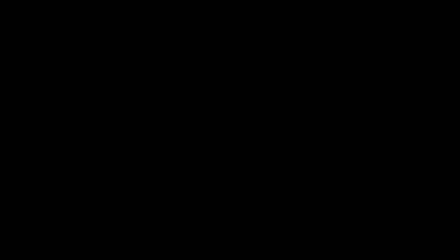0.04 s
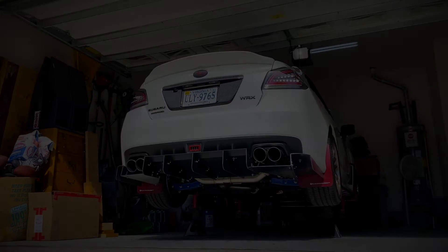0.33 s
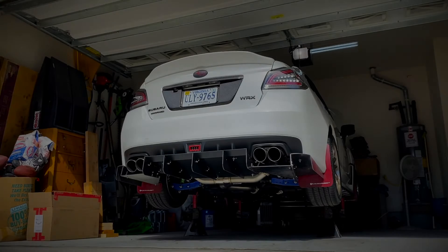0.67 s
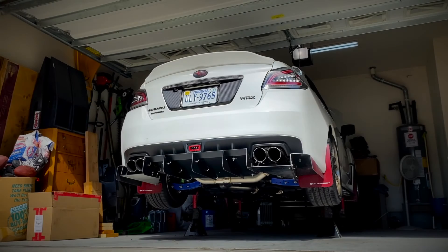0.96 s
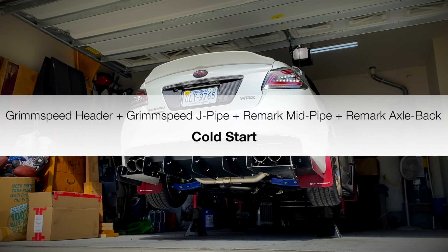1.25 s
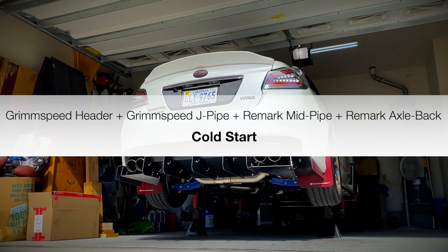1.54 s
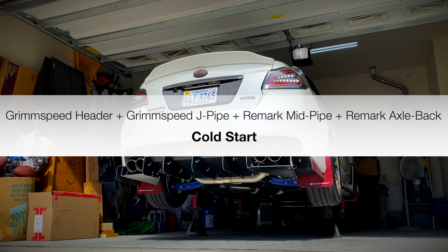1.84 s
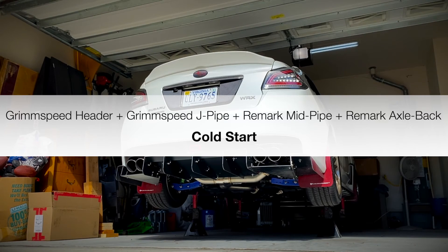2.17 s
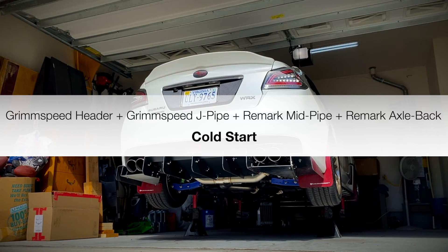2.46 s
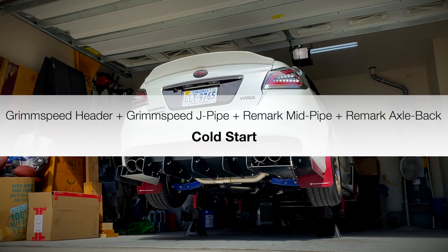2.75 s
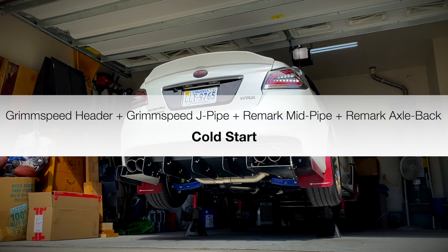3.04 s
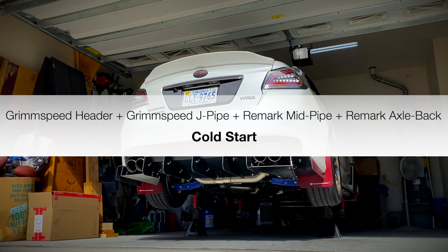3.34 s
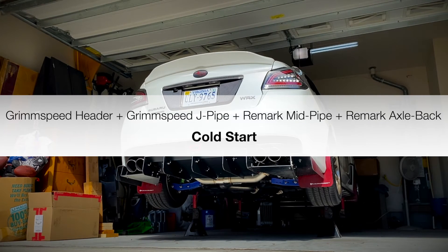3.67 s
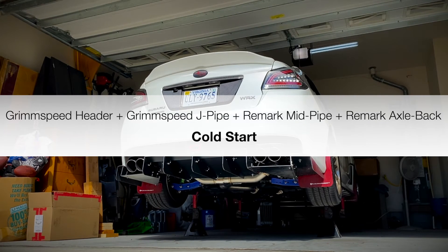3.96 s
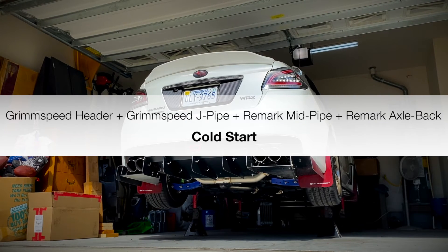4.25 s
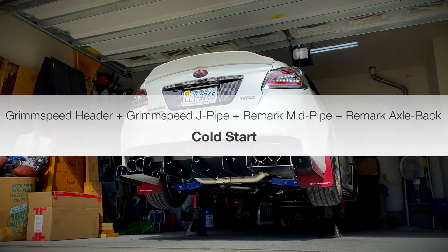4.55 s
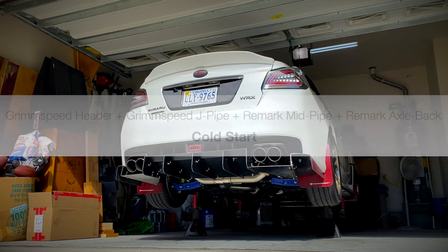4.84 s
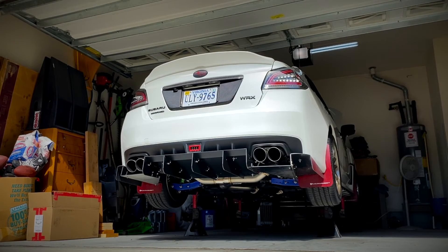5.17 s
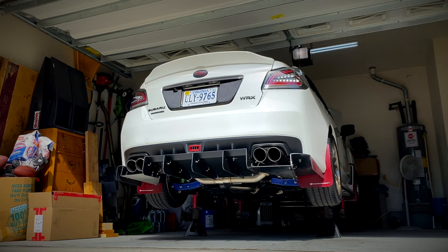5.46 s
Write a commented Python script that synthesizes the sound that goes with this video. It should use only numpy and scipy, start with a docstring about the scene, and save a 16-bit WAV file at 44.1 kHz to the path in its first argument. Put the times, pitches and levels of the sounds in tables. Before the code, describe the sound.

A quiet garage fades in over the first second, heard from behind a parked car: steady compressor hum, thin hiss and a low rumble of air. From 1.3 seconds a bird chirps faintly outside, on and off. Between 2.3 and 3.1 seconds the car body gives four dull thumps, the hardest at 2.8 seconds with a tiny metallic ping. From 4.9 seconds valves knock softly, relays click and the fuel pump whirrs briefly. At about 5.3 seconds the starter engages with a sudden, loud steel clack and a low jolt, then cranks the cold engine. Gear teeth rattle, grind and whine, labouring on each of three compressions while the exhaust gives low, booming puffs. The walls add a short echo. The cranking is the loudest sound and is still going at the end, around 5.7 seconds, before the engine fires.

```python
"""A garage fades in, heard from behind a parked car: compressor hum and hiss over rumbling air.
From 1.3 s a bird chirps faintly outside. At 2.3-3.1 s the car body thumps and a fitting pings.
From 4.9 s valves knock, relays click and the fuel pump primes. At 5.27 s the starter throws its
pinion into the ring gear, jolts the cold engine and cranks it: gear teeth rattle in the bell
housing, harder on each compression, and the exhaust puffs."""
import sys
import numpy as np
from scipy import signal
from scipy.fft import rfft, irfft, next_fast_len
from scipy.io import wavfile
from scipy.ndimage import map_coordinates

SR = 44100
rng = np.random.default_rng(int(sys.argv[2]) if len(sys.argv) > 2 else 0)


def wav_out(sig):
    """Save sig, one row per channel (or a flat mono array), as 16-bit PCM at SR to the path in sys.argv[1]."""
    wavfile.write(sys.argv[1], SR, np.round(np.clip(np.atleast_2d(sig).T, -1, 1) * 32767).astype(np.int16))


N = 251811
T = np.arange(N) / SR
CRANK_S = 5.27

# Fridge compressor and mains tones. Each row: frequency in Hz, level in dB.
HUM_TONES = [(59.2, -57.5), (119.9, -57), (178.8, -65.5), (213, -68), (239.7, -62), (298.3, -65.5),
             (343, -76.5), (358, -78), (416, -80), (479.3, -77.5)]
# Room noise. Each row: frequency in Hz, left-right correlation.
AIR_CORRELATION = [(60, 1), (300, 0.46), (800, 0.79), (1500, 0.29), (3000, 0.67), (4800, 0.068), (6500, 1),
                   (8400, 0.43), (10000, 0.99)]
# Compression strokes. Each row: peak time in seconds, load 0-1, exhaust puff in dB.
COMPRESSIONS = [(5.32, .3, -45.5), (5.435, .42, -41), (5.655, 0.98, -38.5)]


def amp(db):
    """Decibels to gain."""
    return 10 ** (np.asarray(db) / 20)


def unit(x):
    """x at rms 1."""
    return x / np.sqrt(np.mean(x ** 2) + 1e-20)


def along(points, hz):
    """Interpolate (Hz, value) points on a log frequency axis."""
    f, v = np.transpose(points)
    return np.interp(np.log(hz + 1), np.log(f + 1), v)


def wobble(rate_hz):
    """Smooth random curve, rate_hz knots a second."""
    return map_coordinates(rng.standard_normal(int(N * rate_hz / SR) + 4), [T * rate_hz])


def filtered(x, response):
    """x through a complex frequency response."""
    n = x.shape[-1]
    m = next_fast_len(n + SR // 2)
    return irfft(rfft(x, m) * response(np.fft.rfftfreq(m, 1 / SR)), m)[..., :n]


def coloured(x, spectrum):
    """x shaped by a (Hz, dB) curve, at rms 1."""
    return unit(filtered(x, lambda hz: amp(along(spectrum, hz))))


def resonate(x, peaks):
    """x through (Hz, width Hz, dB) resonances of alternating sign, at rms 1."""
    def response(f):
        return sum((-1) ** k * amp(db) * 1j * f * width / (hz * hz - f * f + 1j * f * width)
                   for k, (hz, width, db) in enumerate(peaks))
    return unit(filtered(x, response))


def waver(x, depth_ms, rate_hz):
    """Unsteady pitch from a wandering delay."""
    return map_coordinates(x, [(T + depth_ms / 1000 * wobble(rate_hz)) * SR])


def ring(modes, t, detune=0):
    """Damped (Hz, dB, t60 s) modes, varied on each strike."""
    return sum(amp(db + rng.normal(0, 1) - 60 * t / t60_s)
               * np.sin(2 * np.pi * (hz * (1 + detune * rng.normal()) * t + rng.random()))
               for hz, db, t60_s in modes)


def arrive(x, lag_ms=.297):
    """Sound off the side wall reaches the left microphone first."""
    return filtered(x, lambda hz: np.exp(np.outer([1, -1], 1j * np.pi * hz * lag_ms / 1000)))


def panned(x, balance):
    """Pan by a (Hz, left minus right dB) curve."""
    return filtered(x, lambda hz: amp(np.outer([.5, -.5], along(balance, hz))))


def stereo(pair, correlation):
    """Two independent signals mixed to a correlation curve, left leading."""
    def weights(hz):
        angle = np.arccos(np.clip(along(correlation, hz), -1, 1)) / 2
        return np.array([np.cos(angle), np.sin(angle)])
    mid, side = filtered(pair, weights)
    return arrive(np.array([mid + side, mid - side]))


def garage(x, wet_db):
    """Direct sound shadowed by the car, plus wall reverb that dies sooner in the treble."""
    # Reverb. Each row: frequency in Hz, t60 in seconds.
    decay = [(150, 0.25), (1000, 0.43), (5000, 0.27), (14000, 0.11)]
    # Reverb. Each row: frequency in Hz, left-right correlation.
    correlation = [(100, 1), (400, 0.91), (1000, 0.15), (3000, 0.059), (5500, 0.18), (7500, 0.66),
                   (9000, 1)]
    # Path around the body. Each row: frequency in Hz, gain in dB.
    shadow = [(1000, 2.5), (4500, -1.5), (6500, -8.5), (8500, -35)]
    hz, t, noise = signal.stft(rng.standard_normal((2, SR // 2)), SR, nperseg=256)
    tail = signal.istft(noise * amp(-60 * t / along(decay, hz)[:, None]), SR, nperseg=256)[1]
    tail = stereo(tail / np.linalg.norm(tail[0]), correlation)
    reverb = signal.fftconvolve(x[None], tail, axes=1)[:, :N]
    direct = filtered(x, lambda hz: amp(along(shadow, hz)))
    return (direct + amp(wet_db) * reverb) / np.hypot(1, amp(wet_db))


def hum():
    """Compressor and mains tones, drifting in level and phase."""
    tones = sum(amp(db + 2.26 * wobble(2.925)) * np.sin(2 * np.pi * hz * T + 0.25 * wobble(3.035))
                for hz, db in HUM_TONES)
    return arrive(np.sqrt(2) * tones)


def air():
    """Low rumble of the room air."""
    # Each row: frequency in Hz, relative density in dB.
    spectrum = [(15, -13), (26, -18), (58, 3), (115, 0.5), (165, -6), (240, -9.5), (300, -12.5),
                (520, -21.5), (1100, -24), (2000, -31.5), (3800, -41), (7300, -47), (11000, -73),
                (14000, -83)]
    gain = amp(-50.5 + 0.8 * wobble(5.94))
    return gain * stereo(coloured(rng.standard_normal((2, N)), spectrum), AIR_CORRELATION)


def compressor():
    """Gas hisses once per motor turn; thin tones sing along."""
    # Each row: frequency in Hz, relative density in dB.
    gas_spectrum = [(2500, -48), (4400, -3.5), (4900, -3.5), (5600, -1.5), (6400, 1.5), (7300, 1),
                    (8000, -12.5), (9700, 5.5), (11700, -6), (13000, -30.5)]
    # Each row: centre in Hz, width in Hz, relative gain in dB.
    thin_tones = [(4220, 40, -2), (4930, 120, -4), (6070, 91, -5.5)]
    motor_hz = HUM_TONES[0][0]
    stroke = 1.14 + np.exp(-9 * (motor_hz * T % 1))
    gain = amp(-74.5 + 0.77 * wobble(12))
    hiss = stereo(coloured(stroke * rng.standard_normal((2, N)), gas_spectrum), AIR_CORRELATION)
    return gain * hiss + amp(-85) * resonate(rng.standard_normal((2, N)), thin_tones)


def bird(quaver_hz=25.6):
    """Short gliding whistles and hoarse chips."""
    # Each row: start in seconds, length in seconds, first and last pitch in Hz, level in dB.
    whistles = [(1.458, .07, 3650, 3640, -67.5), (1.515, .07, 3600, 3580, -73),
                (2.91, 0.035, 3620, 3660, -71), (2.968, 0.033, 3620, 3630, -72),
                (4.048, .03, 3300, 3550, -73), (4.071, .03, 3640, 3620, -66),
                (4.112, .03, 3635, 3580, -66.5), (4.108, .036, 3550, 3050, -75),
                (4.135, .075, 3600, 3560, -76), (5.143, 0.062, 3560, 3620, -69.5),
                (5.213, .026, 3580, 3580, -67)]
    # Each row: start in seconds, length in seconds, centre in Hz, width in Hz, level in dB.
    chips = [(1.3, .05, 4100, 900, -73), (2.447, .05, 4030, 250, -76), (2.728, 0.066, 4270, 1000, -72),
             (3.878, 0.071, 4300, 900, -74), (4.108, 0.087, 3250, 350, -75.5)]

    def swell(start_s, length_s):
        return np.sin(np.pi * np.clip((T - start_s) / length_s, 0, 1))
    out = np.zeros(N)
    for start_s, length_s, first_hz, last_hz, db in whistles:
        glide_hz = np.interp(T, [start_s, start_s + length_s], [first_hz, last_hz])
        phase = 2 * np.pi * np.cumsum(glide_hz + quaver_hz * wobble(200)) / SR
        out += amp(db + 5.1 * wobble(90)) * swell(start_s, length_s) * np.sin(phase)
    for start_s, length_s, hz, width_hz, db in chips:
        rasp = resonate(rng.standard_normal(N), [(hz, width_hz, 0)])
        out += amp(db) * swell(start_s, length_s) * rasp
    return out


def thumps(rebound_s=.015, rebound_db=-5.5, trim_t60_s=0.21, attack_s=0.002):
    """Each blow and its rebound ring the body panels and shake the trim; soft contact dulls them."""
    # Each row: start in seconds, level in dB, contact cut-off in Hz, panel ring gain 0-1.
    blows = [(2.271, -43, 260, 0.24), (2.342, -49, 260, 0.23), (2.788, -39.5, 2120, 0.76),
             (3.054, -46.5, 900, 0.15)]
    # Each row: frequency in Hz, level in dB, t60 in seconds.
    panel_modes = [(141, 4, 0.3), (194, -1, 0.16), (237, -3, 0.24), (340, -4, 0.14), (406.6, 1.5, 0.16),
                   (600, -10, 0.1), (680, -7, 0.097), (830, -14, 0.11), (960, -11, 0.08),
                   (1180, -6.5, 0.064)]
    # Each row: frequency in Hz, relative density in dB.
    trim_spectrum = [(80, 5.5), (300, 10), (550, -1.5), (1200, -10),
                     (3000, -16), (4000, -16), (12000, -12)]
    out, t = np.zeros(N + SR), np.arange(SR // 2) / SR
    for start_s, db, contact_hz, ring_gain in blows:
        for hit_s, hit_db in [(start_s, db), (start_s + rebound_s, db + rebound_db)]:
            trim = coloured(rng.standard_normal(len(t)), trim_spectrum) * amp(-60 * t / trim_t60_s)
            panels = ring_gain * ring(panel_modes, t, detune=0.02)
            blow = (panels + 0.81 * trim) * (1 - np.exp(-t / attack_s))
            dulled = signal.lfilter(*signal.butter(2, contact_hz, fs=SR), blow)
            out[round(hit_s * SR):][:len(t)] += amp(hit_db) * dulled
    return out[:N]


def ping(start_s=2.787, attack_s=.001):
    """A metal fitting rings briefly at the hardest thump."""
    # Each row: frequency in Hz, level in dB, t60 in seconds.
    fitting_modes = [(2800, -53.5, 0.039)]
    t = np.maximum(T - start_s, 0)
    return ring(fitting_modes, t) * (1 - np.exp(-t / attack_s))


def valve_knocks(t60_s=.14):
    """Valves and actuators shake their brackets at ignition-on; softer contact is duller."""
    # Each row: start in seconds, level in dB, attack in seconds, contact cut-off in Hz.
    knocks = [(4.897, -48.5, 0.015, 800), (4.969, -57, .005, 900), (5.054, -39, 0.0067, 513),
              (5.188, -41, 0.0088, 1500)]
    # Each row: centre in Hz, width in Hz, relative gain in dB.
    bracket_modes = [(355, 62, 1), (453, 120, -1.5), (570, 62, -1.5), (765, 86, -6.5), (942, 28, -11),
                     (1330, 500, -16)]
    out = np.zeros(N)
    for start_s, db, attack_s, contact_hz in knocks:
        t = np.maximum(T - start_s, 0)
        shake = resonate(rng.standard_normal(N), bracket_modes)
        dulled = signal.lfilter(*signal.butter(3, contact_hz, fs=SR), shake)
        out += amp(db - 60 * t / t60_s) * (1 - np.exp(-t / attack_s)) * dulled
    return out


def small_motors(ramp_s=0.023):
    """The fuel pump and another small motor whirr just before cranking."""
    # Each row: on and off time in seconds, pitch in Hz, level in dB.
    whirrs = [(5.085, 5.173, 583, -65.5), (5.154, 5.248, 937, -66)]
    out = np.zeros(N)
    for on_s, off_s, hz, db in whirrs:
        gate = np.clip(np.minimum(T - on_s, off_s - T) / ramp_s, 0, 1)
        out += amp(db) * gate * np.sqrt(2) * np.sin(2 * np.pi * hz * T + 0.8 * wobble(90))
    return out


def clacks(t60_s=0.094, attack_s=0.0023, heavy_db=-27.5):
    """Relays, solenoid and pinion strike steel: light blows tick thinly, heavy ones ring the pinion."""
    # Each row: start in seconds, level in dB.
    blows = [(4.979, -50.5), (5.054, -47.5), (5.257, -38), (5.269, -31), (5.284, -29)]
    # Struck drive. Each row: frequency in Hz, relative density in dB.
    steel_spectrum = [(60, -24.5), (170, -1), (300, -6), (480, 2), (800, 2), (1250, 3.5), (1750, -2),
                      (2250, -2), (4000, -10.5), (7000, -11), (8300, -9.5), (11500, -15), (13300, -14),
                      (15500, -9.5)]
    # Each row: frequency in Hz, relative level in dB, t60 in seconds.
    pinion_modes = [(926, -15, .2), (1184, -11, .28), (1723, -15, .4), (1954, -11, .4), (2140, -8, .15),
                    (2525, -8, .28), (3112, -12, .15), (13360, -1, .2)]
    out, t = np.zeros(N + SR), np.arange(SR // 2) / SR
    for start_s, db in blows:
        lighter_db = heavy_db - db
        tilt_db_per_octave = 0.15 * lighter_db
        tilted = [(hz, level + tilt_db_per_octave * np.log2(hz / 2000)) for hz, level in steel_spectrum]
        clatter = coloured(rng.standard_normal(len(t)), tilted) * amp(-60 * t / t60_s)
        pinion = amp(3 - 2 * lighter_db) * ring(pinion_modes, t)
        blow = (1.94 * clatter + pinion) * (1 - np.exp(-t / attack_s))
        out[round(start_s * SR):][:len(t)] += amp(db) * blow
    return out[:N]


def jolts(attack_s=0.01, t60_s=0.17):
    """The block jerks on its mounts: once with the heavy clunk at 5.06 s, then as the drive engages and takes
    up the load."""
    # Each row: start in seconds, frequency in Hz, level in dB.
    thuds = [(5.06, 104, -40.5), (5.255, 141, -39), (5.301, 174.7, -31.5), (5.41, 217, -36.5)]
    out = np.zeros(N)
    for start_s, hz, db in thuds:
        t = np.maximum(T - start_s, 0)
        out += ring([(hz, db, t60_s)], t) * (1 - np.exp(-t / attack_s))
    return out


def exhaust(attack_s=0.079, t60_s=0.42, boom_hz=49.3, boom_db=-1.5):
    """Each unfired cylinder puffs air through the pipe, which booms at its lowest note."""
    # Each row: centre in Hz, width in Hz, relative gain in dB.
    pipe_modes = [(77, 61, -0.5), (113, 36, 4), (198, 48, -1.5)]
    flow = np.zeros(N)
    for peak_s, _, db in COMPRESSIONS:
        t = T - peak_s
        flow += amp(db) * np.where(t < 0, np.exp(-(t / attack_s) ** 2), amp(-60 * np.abs(t) / t60_s))
    boom = amp(boom_db) * np.sin(2 * np.pi * boom_hz * T + .4 * wobble(19))
    return (0.5 * resonate(rng.standard_normal(N), pipe_modes) + boom) * flow


def cranking():
    """Load, freedom (0-1) and mesh rate: the engine spins up, comes free, labours on compressions."""
    squeeze_s, release_s = .08, .042
    spin_up_s, free_at_s, freeing_s = .013, 5.505, .025
    stiff_hz, free_hz, sag_hz = 415.4, 554.6, 57.76
    load = sum(size * np.exp(-((T - peak_s) / np.where(T < peak_s, squeeze_s, release_s)) ** 2)
               for peak_s, size, _ in COMPRESSIONS)
    spun_up = 1 - np.exp(-np.maximum(T - CRANK_S, 0) / spin_up_s)
    free = .5 + .5 * np.tanh((T - free_at_s) / freeing_s)
    mesh_hz = spun_up * (stiff_hz + (free_hz - stiff_hz) * free - sag_hz * load)
    return load, free, mesh_hz


def starter(backlash_s=.0001):
    """Meshing teeth knock and scrape, driving housing, ring gear and mounts harder under load."""
    # Tooth rattle. Each row: frequency in Hz, relative gain in dB.
    gear_spectrum = [(120, -13), (200, -27), (290, -21), (500, -14), (800, -8), (1100, -8), (1700, -5.5),
                     (2700, -15), (4500, -10.5), (6000, -13.5), (8300, -11.5), (10000, -15), (12500, -23),
                     (15500, -13)]
    # Reduction gear. Each row: multiple of the mesh rate, relative level in dB.
    whine_partials = [(2, -28), (3, 4), (5, -14), (7, -12.5), (9, -29)]
    # Four resonance sets. Each row: centre in Hz, width in Hz, relative gain in dB.
    housing_modes = [(696, 13, -3.5), (1032, 24, 2), (1100, 11, 3), (1174, 26, 2), (1247, 16, 1),
                     (1633, 21, -2), (1773, 14, 3.5), (2050, 35, 1), (2204, 75, 2), (2500, 92, -0.5),
                     (2840, 51, 2), (3133, 77, 3.5), (3530, 49, 1), (3976, 36, 2), (4440, 53, -2)]
    mount_modes = [(350, 110, -2.5), (490, 49, 0), (566, 61, -2.5), (708, 64, -3.5)]
    ring_gear_modes = [(1178, 16, 8.5), (1500, 130, 1.5)]
    flank_modes = [(1200, 220, 0), (414, 77, -5.5)]
    load, free, mesh_hz = cranking()
    running = T > CRANK_S
    duty_gain = np.sqrt(running.mean())  # refers rms to the running time

    judder = 1 + .014 * wobble(70)
    teeth = np.cumsum(mesh_hz * judder) / SR
    hits = np.flatnonzero(np.diff(np.floor(teeth)))
    scatter, force = rng.standard_normal((len(hits), 2)).T
    hits = np.clip(hits + (backlash_s * SR * scatter).astype(int), 0, N - 1)
    knocks = np.bincount(hits, amp(3.5 * force), N)
    scrape = rng.standard_normal(N) * np.exp(-2.5 * (teeth % 1)) * running
    drive = 0.5 * unit(knocks) + 1.02 * unit(scrape)

    housing = waver(resonate(drive, housing_modes), depth_ms=0.13, rate_hz=35)
    rattle = duty_gain * (0.94 * coloured(drive, gear_spectrum) + 0.48 * housing)
    strain = duty_gain * load ** 1.52
    groan = amp(-40.5) * strain * resonate(drive, mount_modes)
    grind = amp(-39) * strain * resonate(drive, ring_gear_modes)
    # Dry flanks scuff until the engine comes free.
    scuff_gain = duty_gain * amp(-42.5 + 2.5 * wobble(60)) * (1 - free)
    scuff = scuff_gain * waver(resonate(drive, flank_modes), depth_ms=1.09, rate_hz=30)
    motor = amp(-57.5 + 1.2 * wobble(7.8)) * np.sin(np.pi * teeth)  # half the mesh rate
    whine = sum(amp(db + 1.8 * wobble(80)) * np.sin(2 * np.pi * multiple * teeth)
                for multiple, db in whine_partials)
    gears = (rattle + amp(-25.5 + 20 * load) * whine) * amp(-36.5 + 6 * load)
    return (gears + groan + grind + scuff + motor) * running


def scene():
    """Room tone, with bird and car heard through the garage."""
    # Two pan curves. Each row: frequency in Hz, left minus right in dB.
    car_balance = [(100, -0.5), (250, 0), (500, -2), (1200, -1), (2000, -1.5), (3500, 3.5), (5500, 2),
                   (8000, 0)]
    room_balance = [(100, -1.6), (500, 5), (1200, 1), (2000, 4), (3600, 2.5), (5200, 12.5), (6500, -1),
                    (9000, 0)]
    car = garage(clacks(), wet_db=1.5)
    car += garage(starter(), wet_db=-4)
    car += garage(exhaust() + jolts(), wet_db=-7.5)
    car += garage(thumps() + valve_knocks() + small_motors(), wet_db=-5)
    car += garage(ping(), wet_db=-8)
    room_tone = panned(hum() + air() + compressor(), room_balance)
    return room_tone + garage(bird(), wet_db=1) + panned(car, car_balance)


def record(dry):
    """Microphone bass cut, fade-in and a steep treble limit."""
    low_cut_hz, top_hz = 32, 15550
    fade_start_s, fade_s = .075, 1.01
    fade = np.clip((T - fade_start_s) / fade_s, 0, 1) ** 1.154
    cut = signal.sosfilt(signal.butter(4, low_cut_hz, 'high', fs=SR, output='sos'), dry)
    return filtered(cut * fade, lambda hz: 1 / np.sqrt(1 + (hz / top_hz) ** 400))


dry = scene()
out = record(dry)
wav_out(out)
```